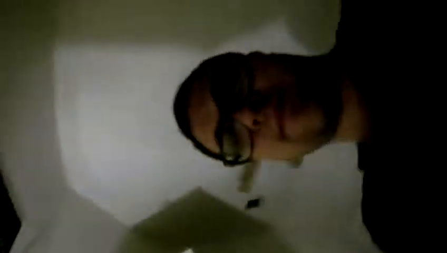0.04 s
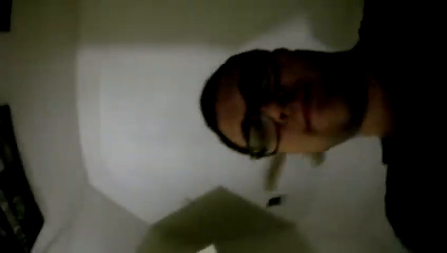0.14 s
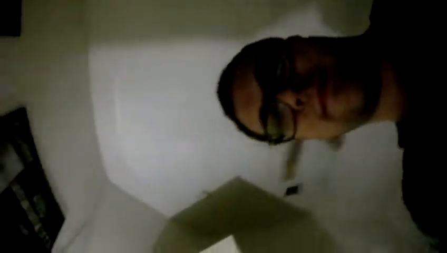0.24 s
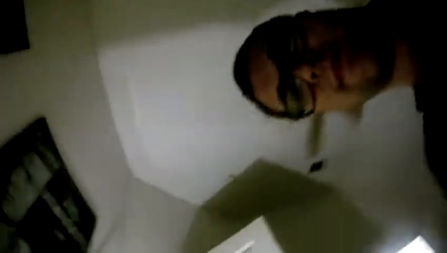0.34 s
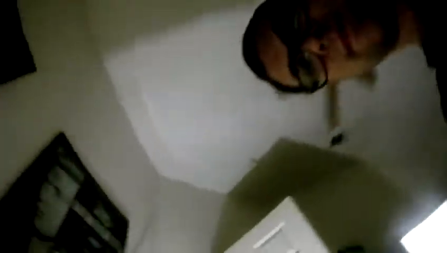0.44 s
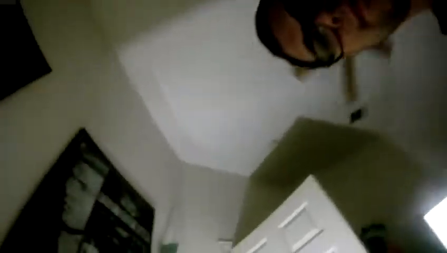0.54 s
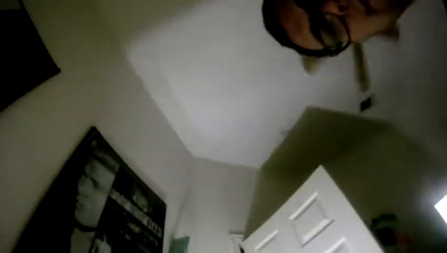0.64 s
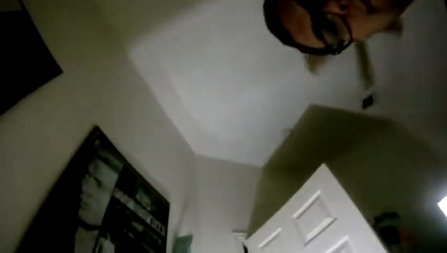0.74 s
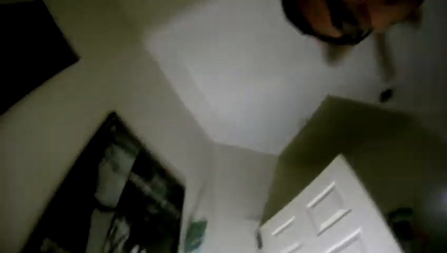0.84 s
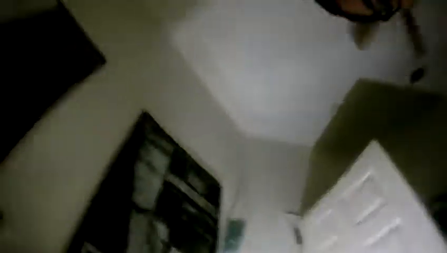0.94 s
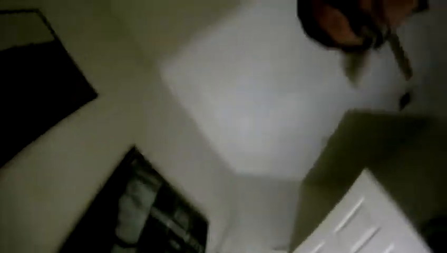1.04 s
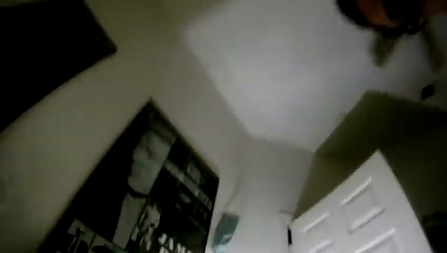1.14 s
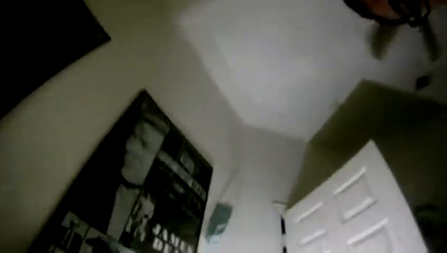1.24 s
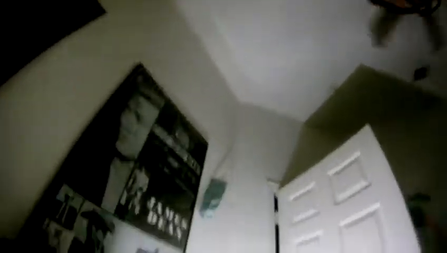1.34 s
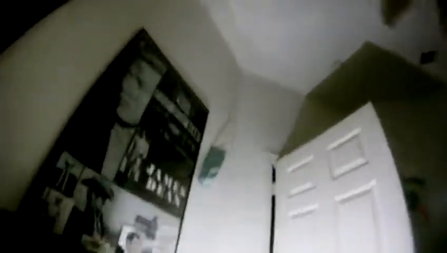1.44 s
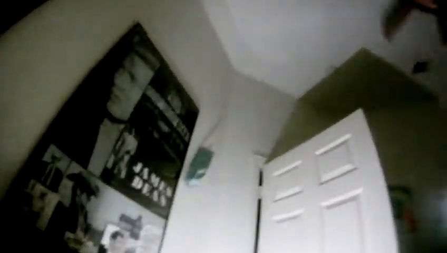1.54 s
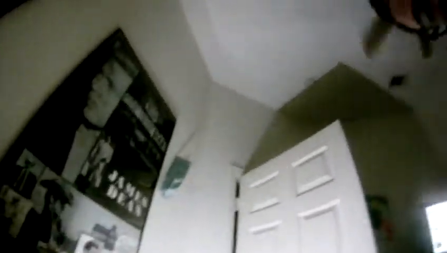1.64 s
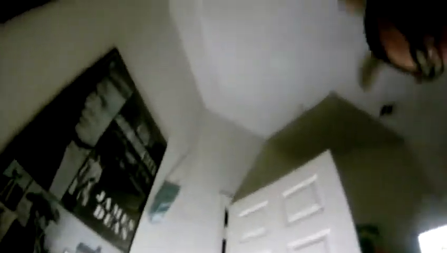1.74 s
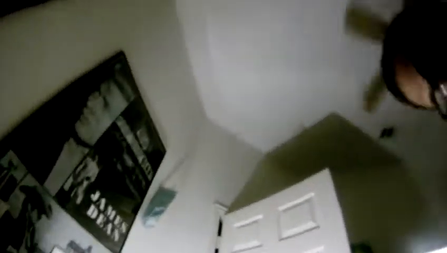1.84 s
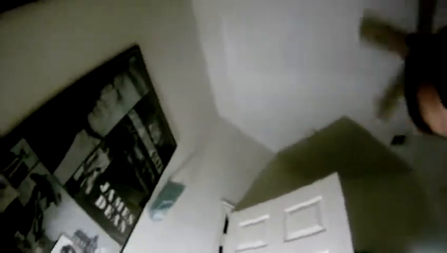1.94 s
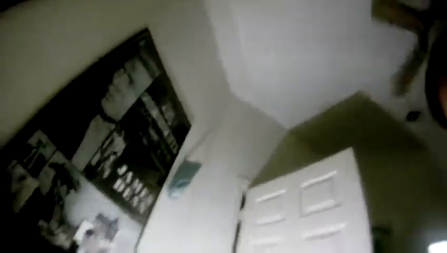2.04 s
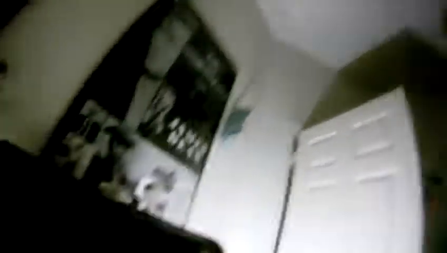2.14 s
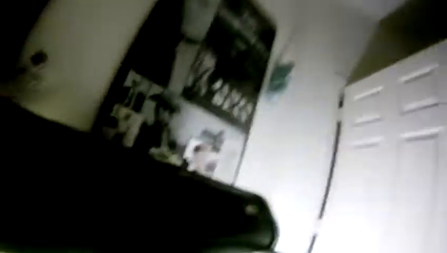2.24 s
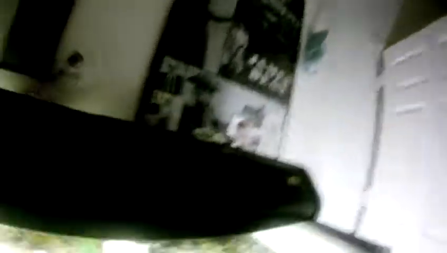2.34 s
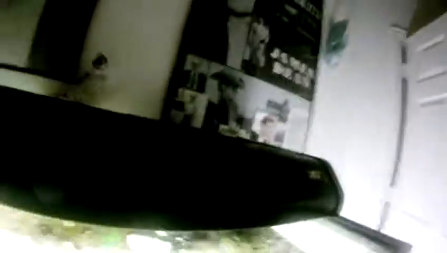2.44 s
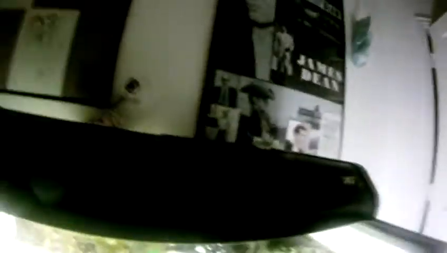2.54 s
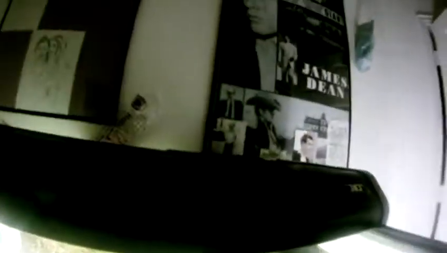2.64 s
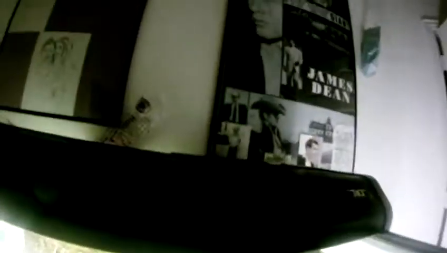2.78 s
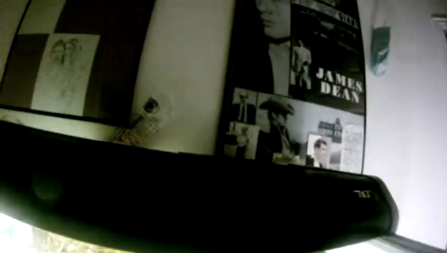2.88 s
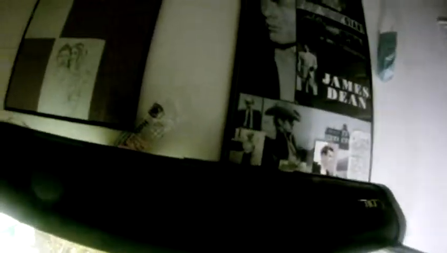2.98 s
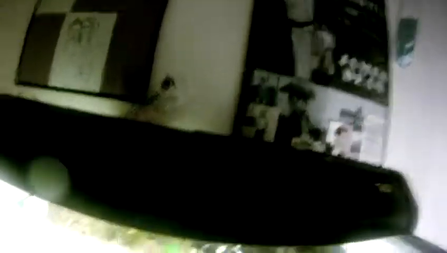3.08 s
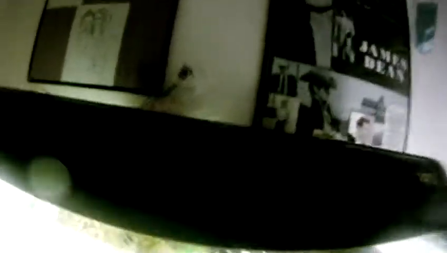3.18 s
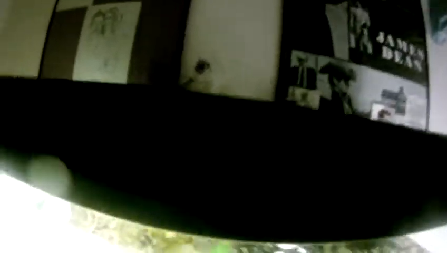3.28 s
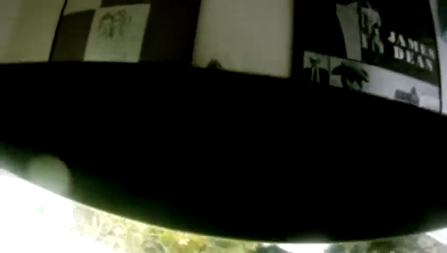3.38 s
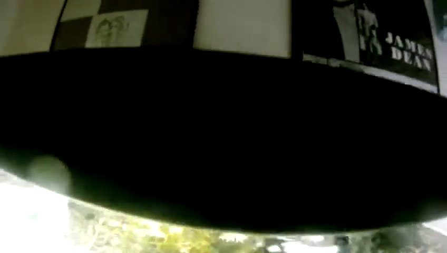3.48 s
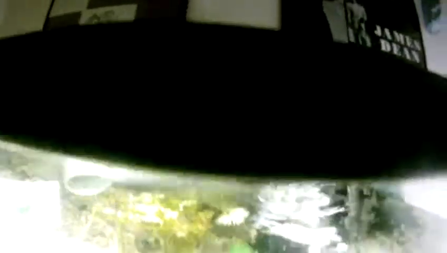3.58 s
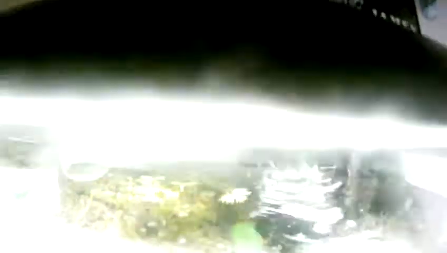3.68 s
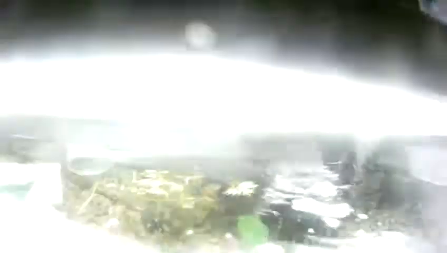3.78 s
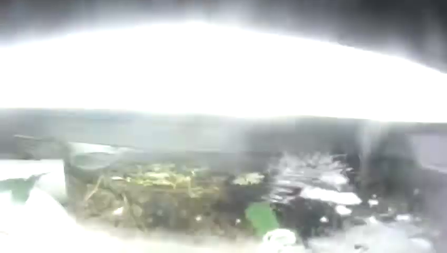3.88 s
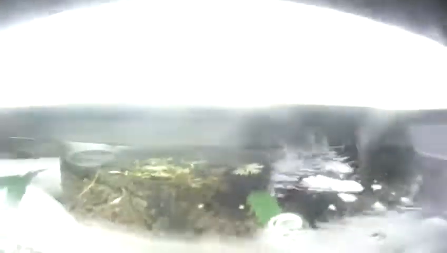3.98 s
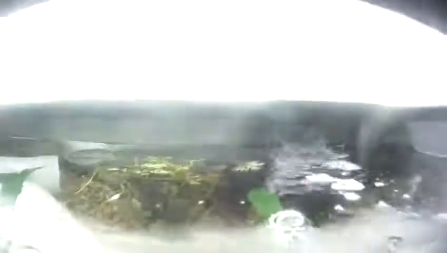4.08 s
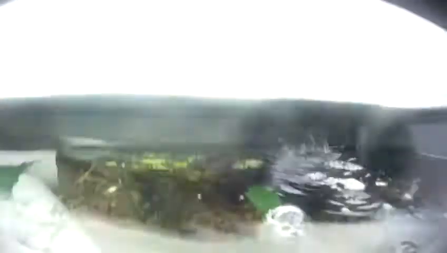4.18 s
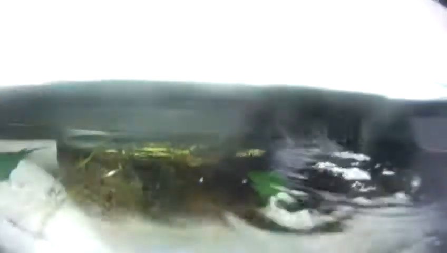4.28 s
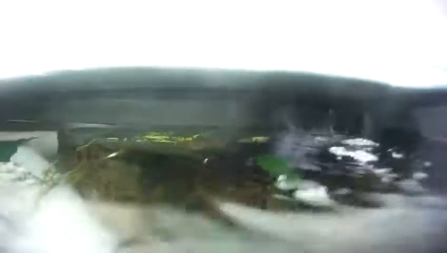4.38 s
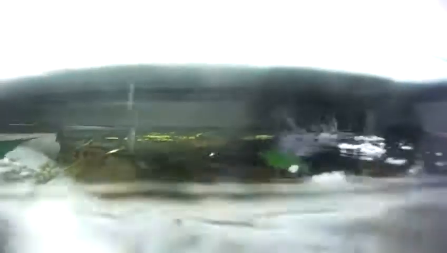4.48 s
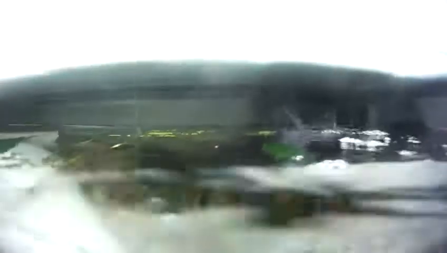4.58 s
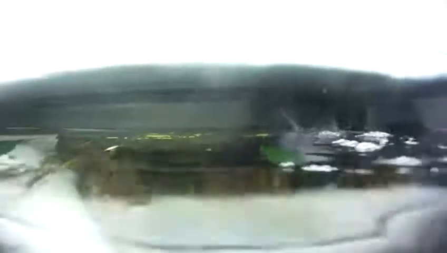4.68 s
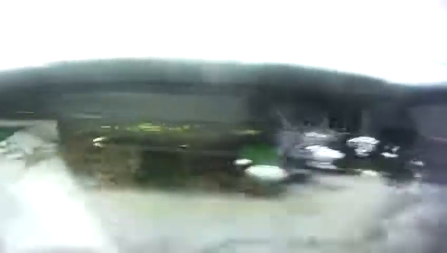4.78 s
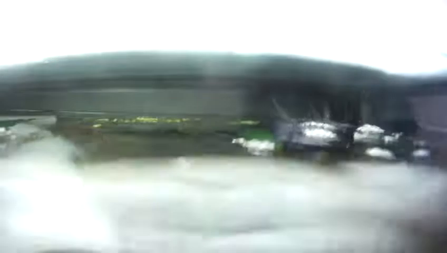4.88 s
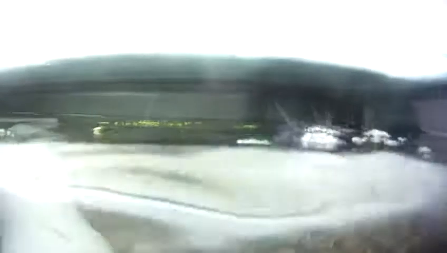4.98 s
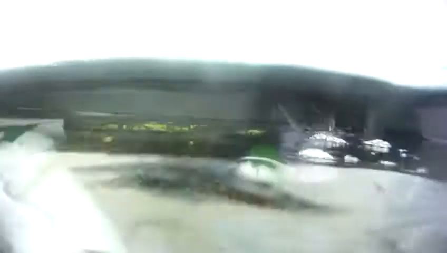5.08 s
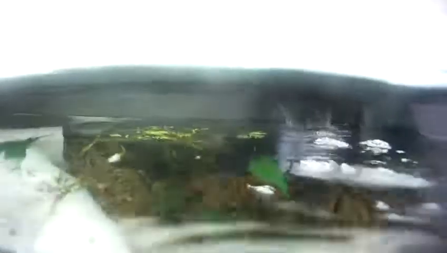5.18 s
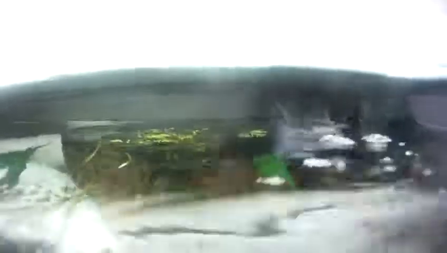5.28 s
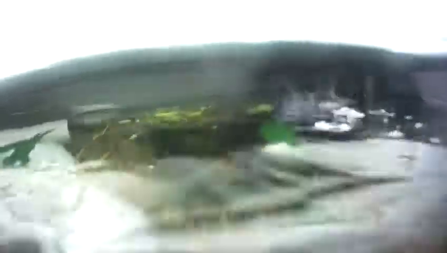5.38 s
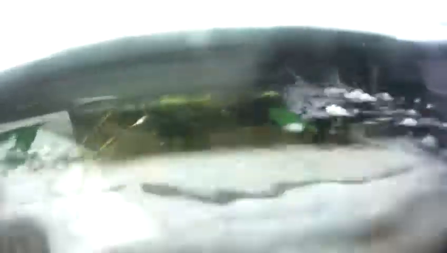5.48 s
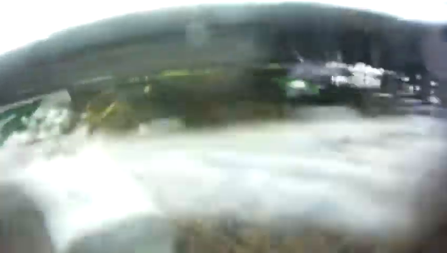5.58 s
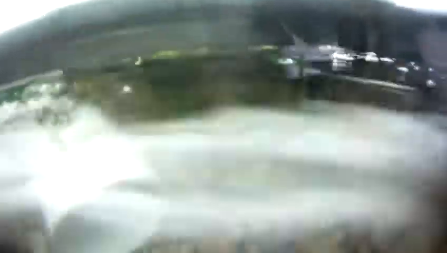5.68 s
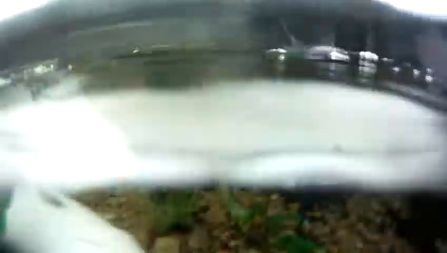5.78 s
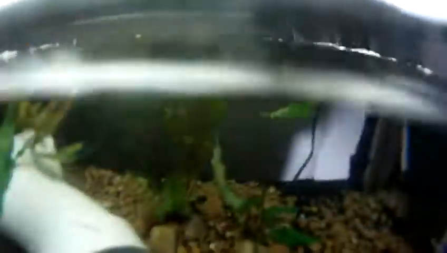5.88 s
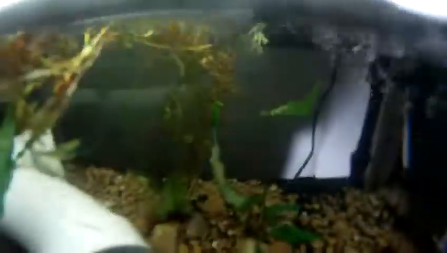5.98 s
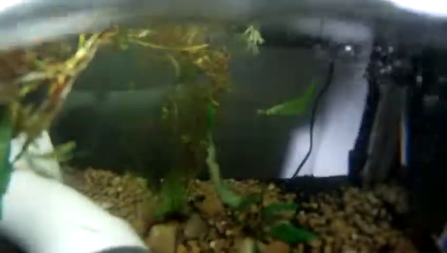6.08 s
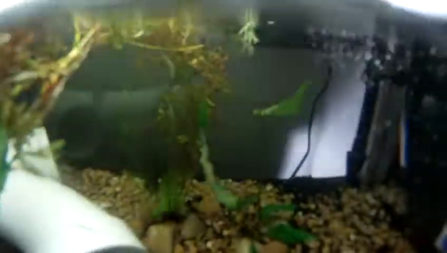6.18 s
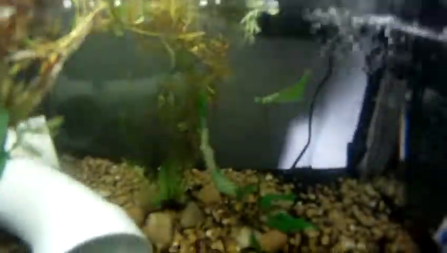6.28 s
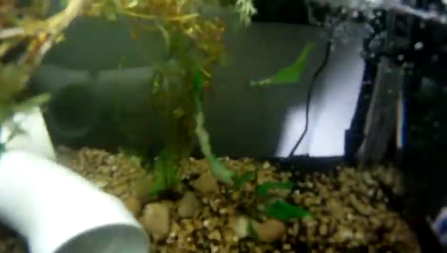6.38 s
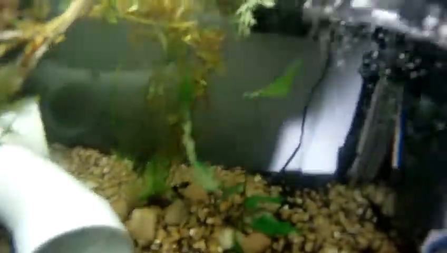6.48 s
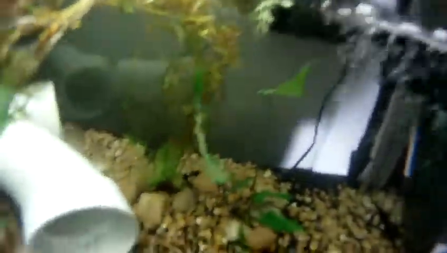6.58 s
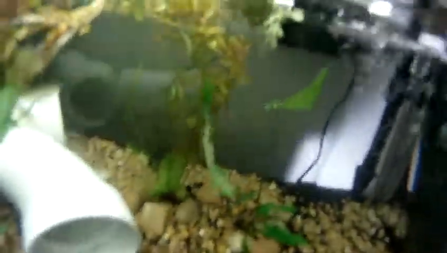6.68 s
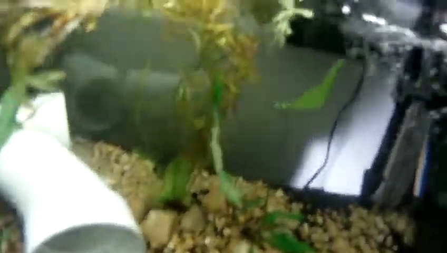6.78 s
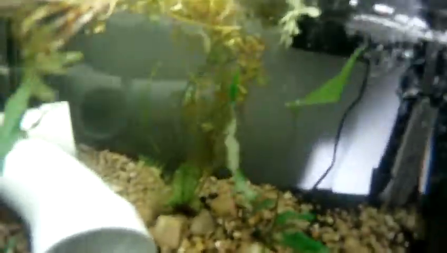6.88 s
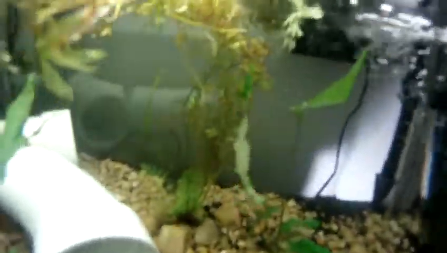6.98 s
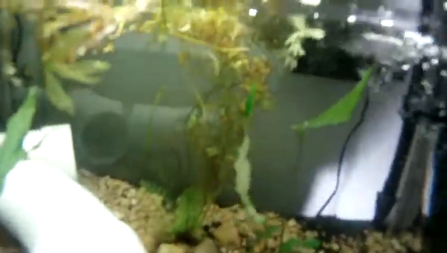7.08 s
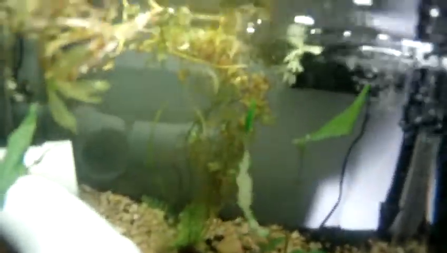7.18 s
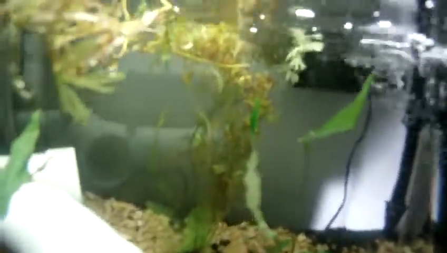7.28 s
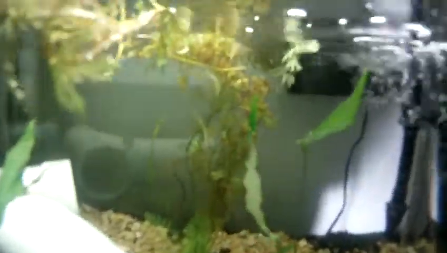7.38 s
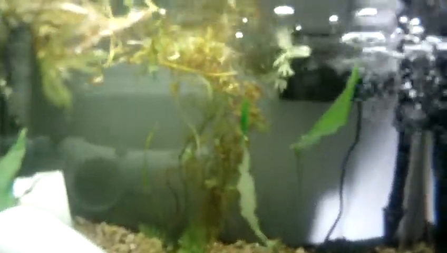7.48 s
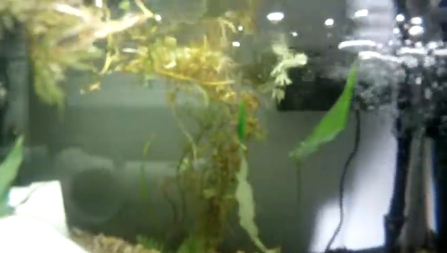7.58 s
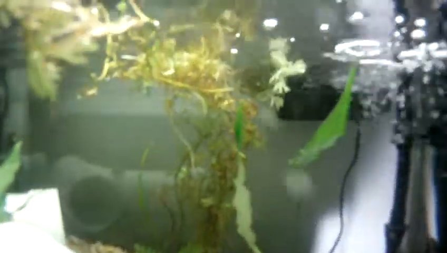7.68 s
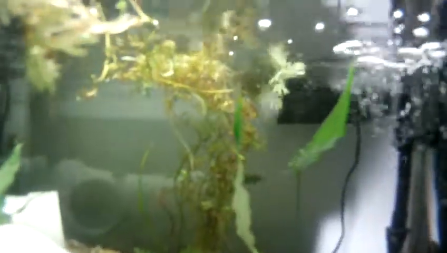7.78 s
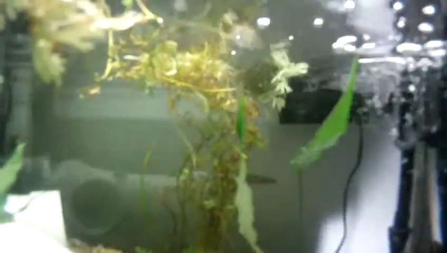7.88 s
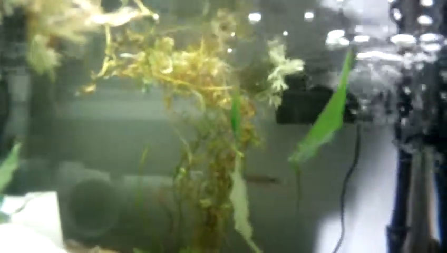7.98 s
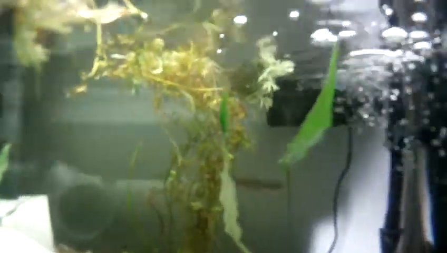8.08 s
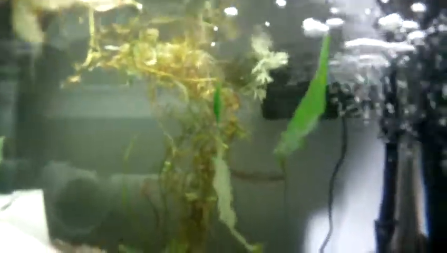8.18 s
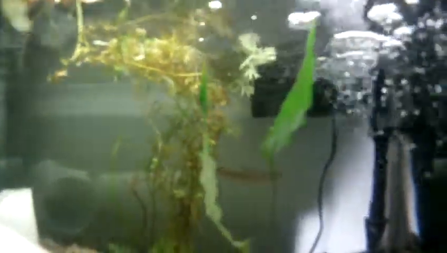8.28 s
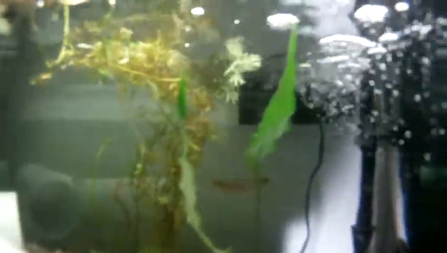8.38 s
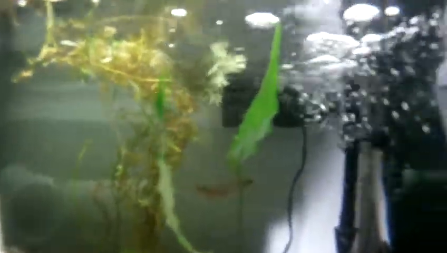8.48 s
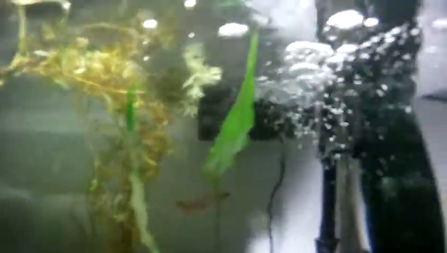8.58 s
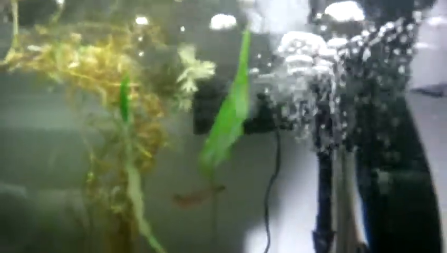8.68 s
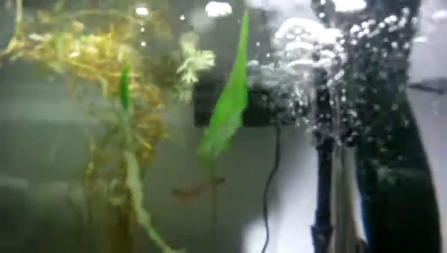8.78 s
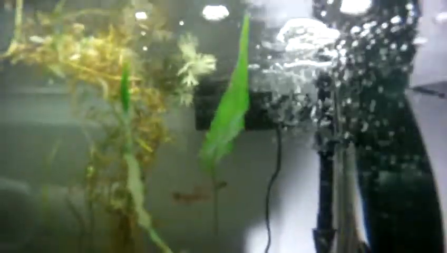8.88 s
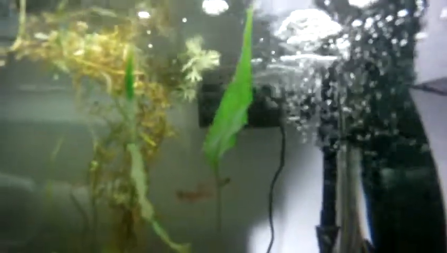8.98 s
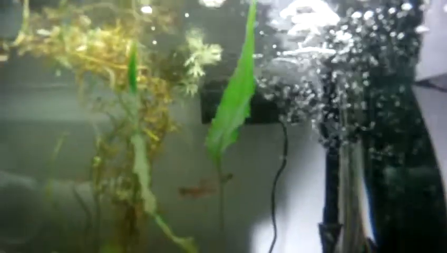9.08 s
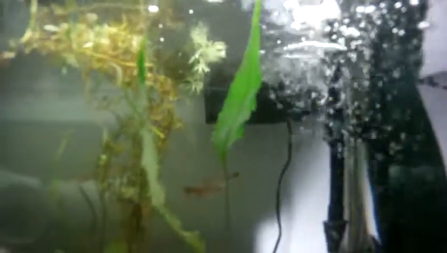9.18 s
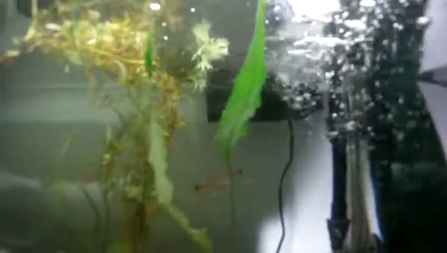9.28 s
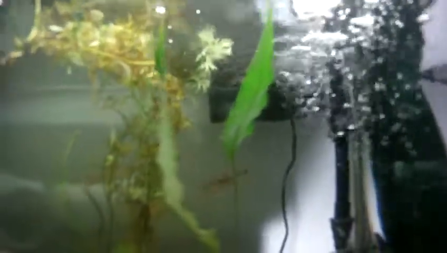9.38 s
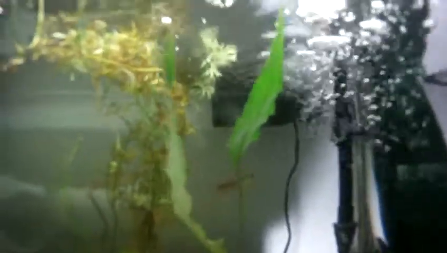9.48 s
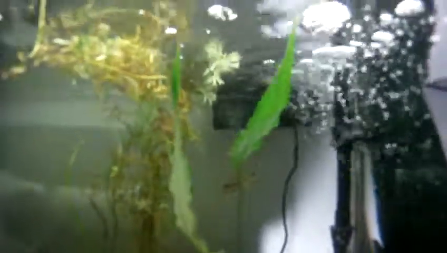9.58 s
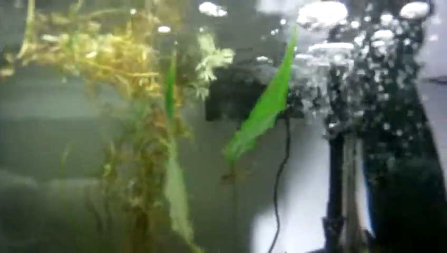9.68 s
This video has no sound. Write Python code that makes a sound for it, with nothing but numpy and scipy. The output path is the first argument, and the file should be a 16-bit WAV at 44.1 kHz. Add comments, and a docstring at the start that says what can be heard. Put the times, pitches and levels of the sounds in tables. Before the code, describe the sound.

Fingers tap and rub a hollow plastic camera case, it knocks hard against a fish tank, then sinks into gurgling water over a faint pump hum.

```python
"""At a fish tank, a small camera in a waterproof plastic case is carried up and dipped in.
Fingers tap, rub and judder on the case and it bounces against the tank: pushes and gritty noise
ring its resonances. The filter outflow trickles, made of many tiny ringing bubbles, and single drops pop.
As the case sinks it fizzes, and the pump's hum (sine waves) and churn (filtered noise) come through.
The recorder is a coarse 12 kHz one that overloads."""
import sys
import numpy as np
from scipy import signal
from scipy.fft import rfft, irfft
from scipy.io import wavfile

SR = 44100
rng = np.random.default_rng(int(sys.argv[2]) if len(sys.argv) > 2 else 0)


def file_out(sig):
    """Save sig as 16-bit WAV at sys.argv[1]."""
    # one column per channel
    cols = np.atleast_2d(sig).T
    # limit, then scale
    lim = np.clip(cols, -1, 1)
    pcm = np.round(lim * 32767).astype(np.int16)
    wavfile.write(sys.argv[1], SR, pcm)


N = 429534
TIME = np.arange(N) / SR
SHORT = TIME[:SR // 5]   # the time axis of one short sound, 0.2 s
DIP_START_S, DIP_END_S = 6.6, 7.65   # the case sinks through the surface

# resonances of the plastic case: f/Hz, width/Hz before damping, level/dB
CASE_MODES = [(978, 190, -3.5), (1164, 220, -17), (1465, 330, -8.5), (1748, 140, -7.5), (2022, 170, 4),
              (2180, 160, -24.5), (2600, 890, -24.5), (3380, 920, -13), (3540, 480, -16), (3830, 760, -27)]
# fingers tap the case: t/s, ring level/dB, contact hardness f/Hz
FINGER_TAPS = [(.167, -21, 860), (.223, -36, 565), (.475, -27.5, 700), (.484, -24.5, 705),
               (0.687, -30, 600), (1.033, -16, 2480), (1.137, -20, 4000), (1.368, -17.5, 2500),
               (1.441, -12.5, 3970), (1.494, -20, 2500), (1.798, -27, 1500), (1.886, -28.5, 2000),
               (2.203, -30, 600), (2.295, -32, 504), (2.408, -19, 4050), (2.559, -16.5, 394),
               (2.619, -24.5, 590), (2.651, -25.5, 500), (2.738, -23.5, 1936), (3.028, -33, 1200),
               (3.251, -28, 4040), (3.868, -27, 790), (6.755, -11.5, 3500), (7.436, -19.5, 5030),
               (7.581, -23.5, 3000)]
# how firmly the hand grips and shifts: t/s, relative level/dB
HAND_GRIP = [(0, -46.5), (.85, -48.5), (1.08, -36.5), (1.35, -40.5), (1.7, -47), (2.1, -42.5), (2.6, -37.5),
             (3.12, -35.5), (3.22, -50.5), (3.55, -41.5), (3.75, -48), (5.65, -50.5), (5.9, -47),
             (6.6, -50), (6.85, -36), (7.35, -44.5), (8.3, -57), (9.74, -54)]


def from_db(db):
    """Turn decibels into an amplitude factor."""
    return 10 ** (np.asarray(db) / 20)


def rms_one(x):
    """Scale a sound to an rms of 1."""
    return x / np.sqrt(np.mean(x ** 2) + 1e-20)


def peak_one(x):
    """Scale a sound to a peak of 1."""
    return x / (np.abs(x).max() + 1e-20)


def in_time(rows):
    """Join (t/s, value) rows by straight lines."""
    return np.interp(TIME, *np.transpose(rows))


def add(out, s, sound):
    """Mix a sound into out at time s."""
    at = max(0, int(s * SR))
    out[at:at + len(sound)] += sound[:max(0, N - at)]


def cut(x, hz, kind, order=2):
    """Butterworth filter."""
    corner = np.clip(hz, 10, .45 * SR)
    return signal.sosfilt(signal.butter(order, corner, kind, fs=SR, output="sos"), x + 1e-18)


def coloured(x, spectrum):
    """Shape a steady sound by a table of f/Hz and gain/dB; rms 1."""
    hz, db = np.transpose(spectrum)
    bins = np.maximum(np.arange(SR * 5 + 1) / 10, 1)   # padded to 10 s, so one bin every 0.1 Hz
    gain = from_db(np.interp(np.log(bins), np.log(hz), db))
    return rms_one(irfft(rfft(x, 10 * SR) * gain)[:N])


def drift(rate):
    """Slow chance with a spread of about 1, with rate new values per second."""
    knots = np.arange(0, N / SR + 1, 1 / rate)
    return np.interp(TIME, knots, rms_one(rng.standard_normal(len(knots))))


def resonance(x, hz, width):
    """Two-pole resonance with a gain of about 1 at its top."""
    r = np.exp(-np.pi * width / SR)
    forward = np.array([1, 0, -1]) * (1 - r * r) / 2
    feedback = [1, -2 * r * np.cos(2 * np.pi * hz / SR), r * r]
    return signal.lfilter(forward, feedback, x + 1e-18)


def ping(hz, t60, attack_cycles, glide):
    """A damped swing that builds up over some cycles; its pitch climbs by glide as it dies."""
    phase = 2 * np.pi * hz * np.cumsum(1 + glide * np.minimum(SHORT / t60, 1)) / SR
    build_up = 1 - np.exp(-SHORT * hz / attack_cycles)
    return peak_one(np.sin(phase) * from_db(-60 * SHORT / t60) * build_up)


def depth():
    """Share of the case that is under water, growing evenly during the dip."""
    return np.interp(TIME, [DIP_START_S, DIP_END_S], [0, 1])


def case(force, strengths=None, damping=1):
    """The modes of the case answer a force, each with its own strength."""
    strengths = np.ones(len(CASE_MODES)) if strengths is None else strengths
    return sum(strength * from_db(db) * resonance(force, hz, width * damping)
               for (hz, width, db), strength in zip(CASE_MODES, strengths))


def press(length):
    """One smooth push of a given duration in seconds."""
    return np.sin(np.pi * np.minimum(SHORT / length, 1)) ** 2


def blow(ring_db, push_db, hardness_hz, damping=1, grit_s=0.0025, push_s=0.0019,
         wall_hz=200, wall_width=240, top_hz=3700):
    """A gritty contact rings the case and dents its wall, which squeezes the air inside and springs back."""
    force = .08 * rng.standard_normal(len(SHORT)) * np.exp(-SHORT / grit_s)
    force[0] = 1
    force = cut(force, hardness_hz, "low", order=1)
    force = cut(force, top_hz, "low", order=4)
    place = from_db(rng.standard_normal(len(CASE_MODES)))   # each spot on the case favours other modes
    ring = peak_one(cut(case(force, place, damping), 650, "high", order=3))
    push = peak_one(resonance(press(push_s), wall_hz, wall_width))
    return -from_db(ring_db) * ring - from_db(push_db) * push


def knocks(restitution=.41, shortest_flight_s=.0049, softening=.78):
    """The case hits the tank and may bounce, each bounce sooner and softer than the one before; from the first
    bounce on, each is weaker than the last."""
    # hits: t/s, ring level/dB, push level/dB, hardness f/Hz, number of bounces, first flight t/s,
    # ring level of the first bounce/dB
    hits = [(3.5556, 12, -4.5, 850, 0, 0, 0), (3.641, 17.5, 1.5, 5000, 4, .0114, -12),
            (5.872, -30, -33, 450, 1, .030, -34), (5.961, 20, 3.5, 2600, 1, .023, 0),
            (6.0086, -15, -15, 800, 2, .014, -12), (6.202, 15, -7.5, 6000, 5, .013, 3),
            (6.2987, 4.5, -2.5, 950, 6, .016, -1.5), (6.559, 20, 7, 2700, 6, .0165, 4)]
    tank_damping = 1.6   # pressed against the tank, the case's resonances are this much wider
    ring_loss_db, push_loss_db = 6, 3.5   # from one bounce to the next
    settle_db = -27.5
    out = np.zeros(N)
    for s, ring_db, push_db, hardness_hz, bounces, flight, rebound_db in hits:
        add(out, s, blow(ring_db, push_db, hardness_hz, tank_damping))
        dent_db = -9 + 0.68 * rebound_db   # a bounce that rings louder also dents more
        for k in range(round(bounces)):
            s += flight
            hardness_hz = hardness_hz * softening
            bounce = blow(rebound_db - ring_loss_db * k, dent_db - push_loss_db * k, hardness_hz, tank_damping)
            add(out, s, bounce)
            # flights shrink towards the period of the springy wall
            flight = shortest_flight_s + restitution * (flight - shortest_flight_s)
        if bounces > 4:   # a long run of bounces merges into a low ring
            add(out, s, -from_db(settle_db) * ping(228, t60=.08, attack_cycles=0.73, glide=0))
    return out


def taps(push_db=-12, push_db_per_octave=-5.5):
    """Fingers tap the case; a soft pad dents it more than a hard nail."""
    out = np.zeros(N)
    for s, ring_db, hardness_hz in FINGER_TAPS:
        octaves = np.log2(hardness_hz / 1000)
        dent_db = ring_db + push_db + push_db_per_octave * octaves
        add(out, s, blow(ring_db, dent_db, hardness_hz))
    return out


def judders(unevenness=0.1975, swell_db=9):
    """A fingertip sticks and slips in uneven runs of small blows, on average strongest mid-run."""
    # runs: start t/s, end t/s, slips per second, mid-run ring level/dB, mid-run push level/dB, hardness f/Hz
    runs = [(0.449, 0.501, 114, -23, -58, 780), (1.158, 1.249, 103, -20.5, -28, 450),
            (1.198, 1.242, 182, -27.5, -24.5, 600), (2.113, 2.151, 191, -23.5, -33.5, 600),
            (2.301, 2.348, 110, -40, -37, 898), (2.668, 2.712, 74, -53, -36, 1200),
            (3.117, 3.147, 138, -19, -34, 1298)]
    out = np.zeros(N)
    for start, end, rate, ring_db, push_db, hardness_hz in runs:
        for s in np.arange(start, end, 1 / rate):
            late, strength = rng.standard_normal(2)
            swell = np.sin(np.pi * (s - start) / (end - start)) - 1
            db = swell_db * swell + 2 * strength
            add(out, s + unevenness * late / rate, blow(ring_db + db, push_db + db, hardness_hz))
    return out


def sliding(shape=1.42):
    """Power of the friction: strokes, skids after taps, and the fidgeting of the grip."""
    # fingers slide over the case: t of the peak/s, level/dB, rise and fall time t/s
    finger_strokes = [(0.053, -27.5, 0.052), (.42, -48.5, 0.11), (0.643, -45, 0.016), (.911, -29.5, 0.031),
                      (1.04, -38.5, 0.048), (1.12, -40.5, 0.029), (1.225, -36, 0.047), (1.31, -42, .02),
                      (1.518, -32.5, 0.021), (1.832, -38, 0.027), (1.977, -44, .02), (2.173, -26.5, 0.0099),
                      (2.226, -33, 0.014), (2.33, -44, 0.018), (2.575, -46.5, .028), (2.683, -35, 0.017),
                      (2.742, -39, 0.028), (2.93, -33.5, 0.025), (3.085, -38, 0.031), (3.128, -26, 0.011),
                      (3.251, -26, 0.0024), (6.791, -30.5, 0.0081), (6.856, -36, 0.0088),
                      (7.06, -44, 0.021), (7.57, -44, 0.058)]
    fidget_db, fidget_swing_db = -18, 6.5   # faint chance rubbing, against the grip's level
    skid_db, skid_rise_s, skid_fall_s = -22, 0.0028, .016   # after a tap the finger skids on
    power = from_db(in_time(HAND_GRIP) + fidget_db + fidget_swing_db * drift(12)) ** 2 * (1 - depth())
    strokes = [(s, db, fall, fall) for s, db, fall in finger_strokes]
    skids = [(s + skid_rise_s, db + skid_db, skid_rise_s, skid_fall_s) for s, db, hardness_hz in FINGER_TAPS]
    lag = np.arange(-SR // 4, SR // 4) / SR
    for s, db, rise, fall in strokes + skids:
        swell = from_db(db) * np.exp(-np.abs(lag / np.where(lag < 0, rise, fall)) ** shape)
        add(power, s + lag[0], swell[s + lag >= 0] ** 2)   # drop what would come before the start
    return power


def rubbing(rough_db=3.5, skin_db=-19):
    """Skin slides over plastic: dense catches excite the case, with a dull drag underneath."""
    # spectrum of the scraping: f/Hz, relative gain/dB
    scrape_spectrum = [(300, -15.5), (620, -5), (900, 6.5), (1200, 8), (1700, 3), (2100, 7), (2650, 3),
                       (3300, 10.5), (4200, -6), (5200, 1), (6000, -10.5)]
    drag_spectrum = [(40, -13), (130, 7.0), (350, -6), (600, -10.0), (1500, -18), (5000, -49)]
    friction = rng.standard_normal(N) * from_db(rough_db * drift(600) + drift(160))
    place = [from_db(2 * drift(16)) for mode in CASE_MODES]   # the moving finger favours changing modes
    scrape = coloured(case(friction, place), scrape_spectrum)
    drag = coloured(friction, drag_spectrum)
    return np.sqrt(sliding()) * (scrape + from_db(skin_db) * drag)


def handling(leak_hz=62, rumble_db=-3):
    """Slow pushes change the pressure in the case, which leaks away; the grip rumbles."""
    # soft bumps of the hand on the case: t/s, peak level/dB, contact t/s
    soft_bumps = [(1.016, -27, .01), (1.111, -22.5, 0.0056), (2.171, -27.5, .0082), (2.852, -25, .0073),
                  (2.947, -23.5, .011), (2.974, -31, 0.014), (3.142, -22, 0.0057), (3.643, -13.5, 0.0052),
                  (5.269, -36, 0.0057), (5.872, -28.5, .005), (5.9, -24, .0062)]
    # low throbs as the case goes under, each with a weaker after-beat: t/s, peak level/dB, after-beat delay t/s
    low_throbs = [(6.751, -16, 0.056), (6.8453, -16, .023), (6.899, -16, .029), (6.96, -18, .058),
                  (7.054, -17, .029), (7.126, -23, 0.041)]
    # the case rocks in the hand: t/s, peak level/dB, f/Hz
    rocking = [(2.41, -17, 43), (4.532, -24, 60.7), (4.755, -37, 51), (4.859, -34, 45), (5.537, -28.5, 52)]
    # spectrum of the grip's rumble: f/Hz, relative gain/dB
    rumble_spectrum = [(15, -2.5), (35, 0.5), (60, -3.5), (100, -11), (200, -21.5), (400, -26.5),
                       (1500, -56)]
    throb_s, afterbeat_s, afterbeat_db = 0.0052, 0.0067, -8.5
    out = from_db(in_time(HAND_GRIP) + rumble_db) * coloured(rng.standard_normal(N), rumble_spectrum)
    throbs = [(s, db, throb_s) for s, db, delay in low_throbs]
    afterbeats = [(s + delay, db + afterbeat_db, afterbeat_s) for s, db, delay in low_throbs]
    for s, db, length in list(soft_bumps) + throbs + afterbeats:
        pressure = cut(press(length), leak_hz, "high")
        add(out, s, from_db(db) * peak_one(pressure))
    for s, db, hz in rocking:
        add(out, s, -from_db(db) * ping(hz, t60=0.092, attack_cycles=.6, glide=0))
    return out


def plops(splash_db=-7, reach=0.92, long_s=0.026):
    """Bubbles and drops close by; the short, violent ones also flick the case, the long ones ring cleaner."""
    # loud drops: t/s, level before the final filter/dB, starting f/Hz, t to fall by 60 dB/s
    loud_drops = [(4.389, -27.5, 2006, 0.068), (4.414, -13, 2076, 0.026), (4.4172, -6, 3320, 0.0018),
                  (4.419, -19.5, 765, 0.03), (4.424, -13, 2080, 0.014), (4.823, -33, 2087, .09),
                  (5.327, -26.5, 2176, .068), (5.604, -31, 2170, 0.05), (5.848, -30, 2220, 0.055),
                  (6.397, -30, 2050, .052), (7.435, -18.5, 2550, 0.0076), (7.6605, -10, 2130, 0.0058),
                  (8.990, -9, 1230, 0.017), (8.9905, -27.5, 1850, .024), (9.069, -28.5, 1120, 0.063),
                  (9.274, -30.5, 1340, 0.078), (9.345, -38, 807, 0.14), (9.558, -40, 2190, .074)]
    out = np.zeros(N)
    for s, db, hz, t60 in loud_drops:
        splash = .2 * rng.standard_normal(len(SHORT)) * from_db(-60 * SHORT / t60)
        splash[0] = 1
        violence = min(1, (long_s / t60) ** 2)
        flick = violence * peak_one(case(cut(splash, reach * hz, "low", order=3)))
        ring = ping(hz, t60, attack_cycles=0.31, glide=0.065)
        add(out, s, from_db(db) * (ring + from_db(splash_db) * flick))
    return cut(out, 645, "high", order=5)


def fizz(hz=3660, width=330, rough_db=5, spray_db=-21):
    """Tiny bubbles burst on the case as the water closes over it, and excite one of its high modes."""
    start_s = 6.783   # water first washes over the case
    burst_db, fall_db_per_s = -28.5, 322
    sinking_db, under_db = -55.5, -67.5   # while the case sinks, and once it is under
    bursts = rng.standard_normal(N) * from_db(rough_db * drift(350))
    wet_s = np.maximum(TIME - start_s, 0)
    first_wash = from_db(burst_db - fall_db_per_s * wet_s)
    lasting = from_db(np.where(TIME < DIP_END_S, sinking_db, under_db))
    level = (wet_s > 0) * np.hypot(first_wash, lasting)
    spray = from_db(spray_db) * cut(bursts, 3000, "high")
    return level * rms_one(resonance(bursts, hz, width) + spray)


def bubbles(per_s, size_db, ring_s, wash_db, count=60):
    """Bubbles of many sizes ring at random moments over noisy wash; the many small, high ones blur into fizz."""
    out, draws = np.zeros(N), np.random.default_rng(rng.integers(2 ** 31))
    for hz in np.geomspace(750, 5500, count) * rng.uniform(1.0, 1.02, count):
        smallness = hz / 2000
        births = int(per_s * smallness ** 2 * N / SR / count) + 1
        clicks = np.zeros(N)
        moments = draws.integers(0, N, births)
        clicks[moments] = from_db(size_db * np.minimum(draws.exponential(1, births), 3))
        width = np.log(1000) / np.pi / ring_s * smallness   # a 2 kHz bubble falls by 60 dB in ring_s
        out += resonance(clicks, hz, width) / smallness
    return rms_one(out) + from_db(wash_db) * rng.standard_normal(N)


def trickle(gush_db=3.5, surge_db=1.0, gurgle_db=-52.5):
    """The filter outflow, bright in air and lower and sparser from below the surface."""
    # the outflow through the air, louder as the case comes near: t/s, level before gushing/dB
    air_level = [(0, -62.5), (3.4, -56.5), (4.3, -44.5), (4.65, -51), (6.1, -47.5), (6.9, -49.5)]
    # spectrum heard in air: f/Hz, relative gain/dB
    air_spectrum = [(100, -16.5), (250, -11), (650, -16.5), (1000, -13), (1250, -16.5), (1500, -7.5),
                    (1750, -21), (2050, 1), (2280, 0), (2600, -23.5), (3350, -9.5), (4000, -23),
                    (5200, -18), (6000, -25.5)]
    # spectrum heard under water: f/Hz, relative gain/dB
    water_spectrum = [(300, 13.5), (700, -15), (830, 13.5), (1020, 3), (1250, 1.5), (1480, 10), (1680, -2),
                      (1900, 6), (2230, 2.5), (2650, -10), (3550, -14.5), (4200, -16), (5200, -11),
                      (6000, -18)]
    above = bubbles(per_s=640, size_db=5, ring_s=.04, wash_db=-1)
    below = bubbles(per_s=420, size_db=4.5, ring_s=.065, wash_db=-2)
    in_air = from_db(in_time(air_level) + gush_db * drift(22)) * coloured(above, air_spectrum)
    under = from_db(gurgle_db + surge_db * drift(7.8)) * coloured(below, water_spectrum)
    return np.sqrt(1 - depth()) * in_air + np.sqrt(depth()) * under


def pump(churn_db=-46.5, waver_db=2.0, in_air_db=-31, under_db=-2):
    """Motor lines of the pump over the low churn of its water, heard fully once the case is under."""
    # steady tones of the motor: f/Hz, level before wavering and coupling/dB
    motor_lines = [(60, -58), (160, -62), (180, -64), (240, -47.5), (280, -64), (480, -59), (540, -64),
                   (600, -60)]
    # spectrum of the churning water: f/Hz, relative gain/dB
    churn_spectrum = [(25, 0), (60, -1), (90, -10.5), (150, 0), (200, -9.5), (290, -2), (390, -4),
                      (450, -0.5), (560, -5), (635, 3.5), (690, -12.5), (800, -18), (2000, -50.5)]
    drone_hz, drone_db, swing_db = 120, -57, 8
    beat_hz, swell_s = 0.5, 7.38   # the drone swells and sinks slowly, with one peak at swell_s
    hum = np.zeros(N)
    for hz, db in motor_lines:
        tone = np.sqrt(2) * np.sin(2 * np.pi * (hz * TIME + rng.random()))
        hum += from_db(db + waver_db * drift(1)) * tone
    swell_db = swing_db * np.cos(2 * np.pi * beat_hz * (TIME - swell_s))
    drone = from_db(drone_db + swell_db) * np.sqrt(2) * np.sin(2 * np.pi * drone_hz * TIME)
    churn = from_db(churn_db) * coloured(rng.standard_normal(N), churn_spectrum)
    coupling = from_db(in_air_db) + from_db(under_db) * depth()
    return depth() * drone + coupling * (hum + churn)


def room_hiss(level_db=-61):
    """Faint, broad room noise seeps into the case until the water closes over it."""
    open_air = np.sqrt(1 - depth())
    spectrum = [(100, -4.5), (600, -6), (950, -3.0), (1700, -5.5), (2050, 0), (2700, -4.5),
                (3500, -7.5), (5000, -14.5), (6000, -23.5)]
    return from_db(level_db) * open_air * coloured(rng.standard_normal(N), spectrum)


def scene():
    """Everything reaches one microphone inside the case."""
    touches = knocks() + taps() + judders() + rubbing() + handling()
    water = plops() + fizz() + trickle() + pump()
    return (touches + water + room_hiss())[None]


def record(dry):
    """Overloaded and sampled at 12 kHz; holding each sample mirrors the sound around 12 kHz as metallic sheen."""
    recorder_hz, cutoff_hz = 12000, 15600
    overloaded = np.clip(dry, -1.1, 1.1)
    coarse = np.clip(signal.resample_poly(overloaded, recorder_hz, SR, axis=-1), -1, 1)
    steps = np.repeat(coarse, 8, axis=-1)
    held = signal.resample_poly(steps, SR, 8 * recorder_hz, axis=-1)[:, :N]
    return signal.sosfilt(signal.ellip(8, .3, 60, cutoff_hz, fs=SR, output="sos"), held)


dry = scene()
out = record(dry)
file_out(out)
```